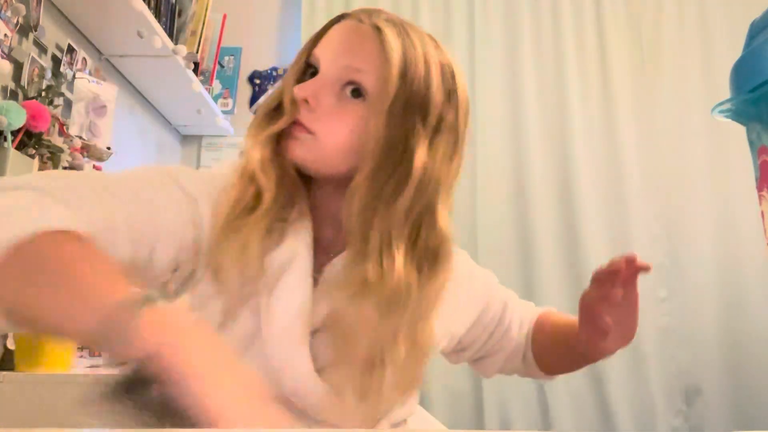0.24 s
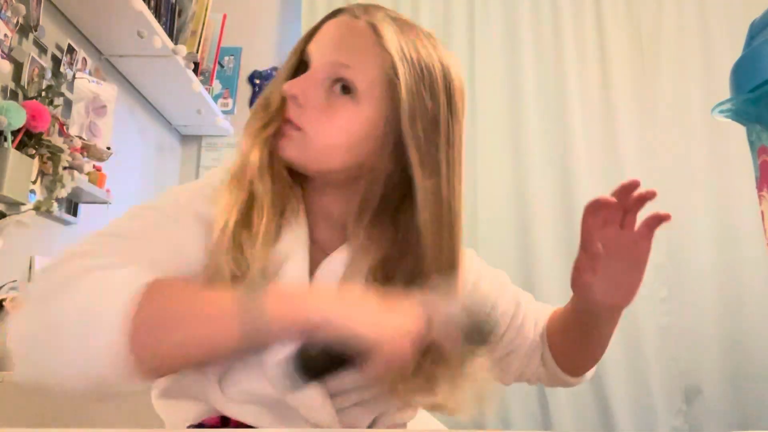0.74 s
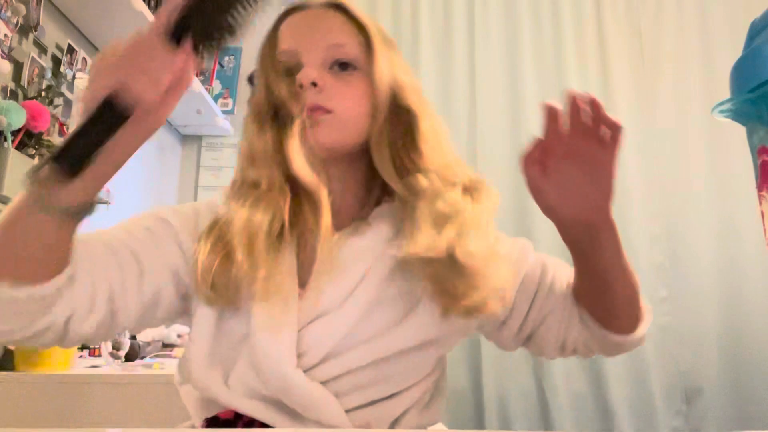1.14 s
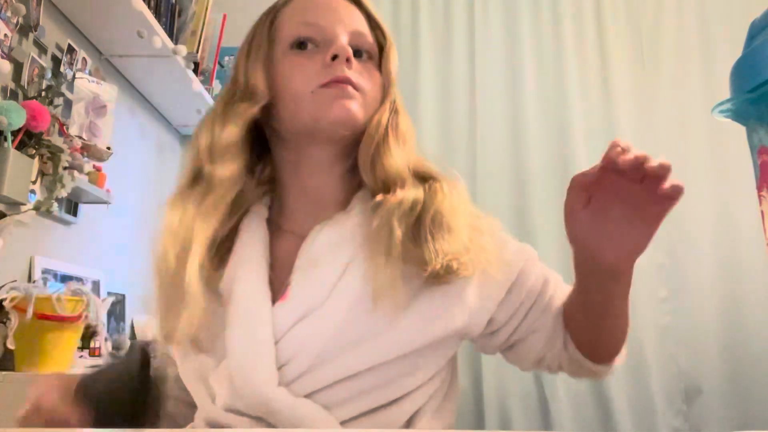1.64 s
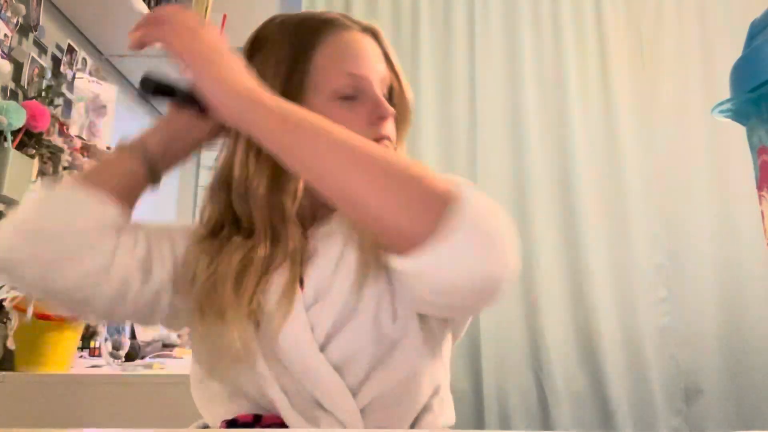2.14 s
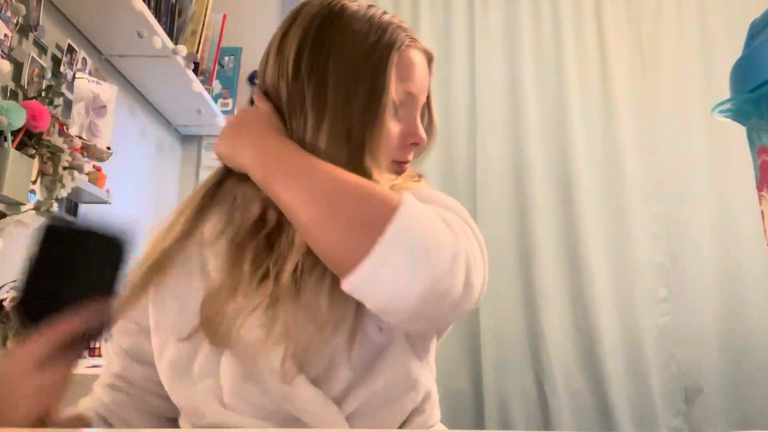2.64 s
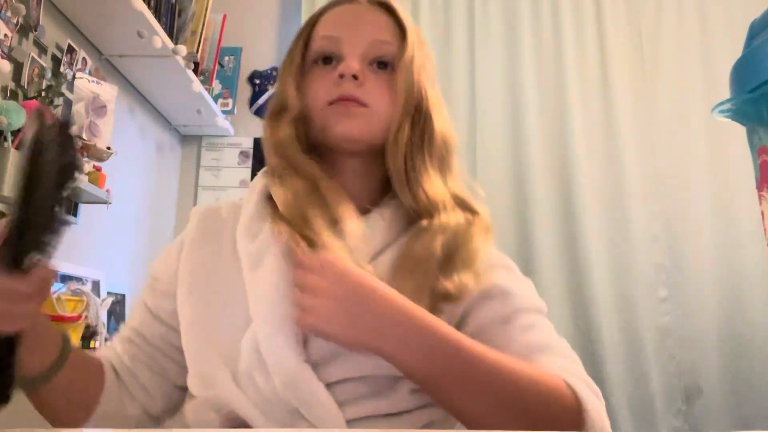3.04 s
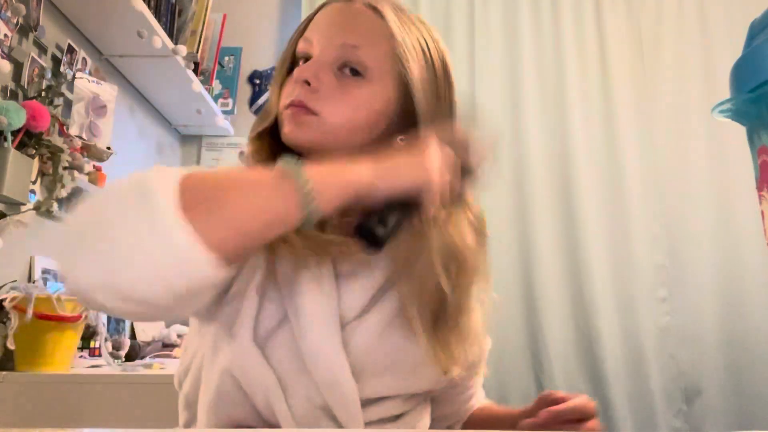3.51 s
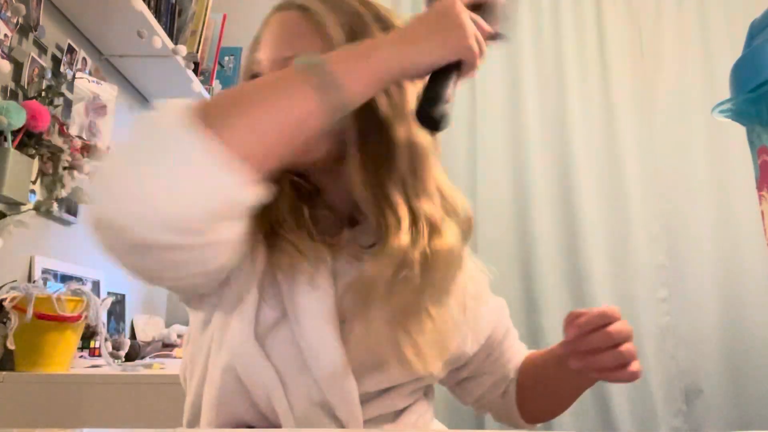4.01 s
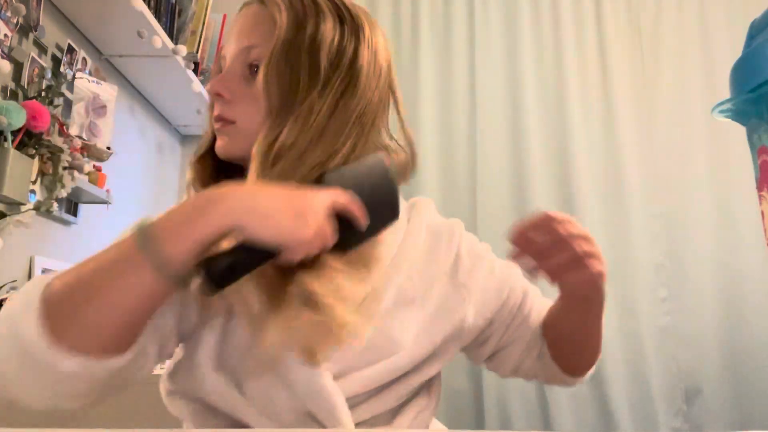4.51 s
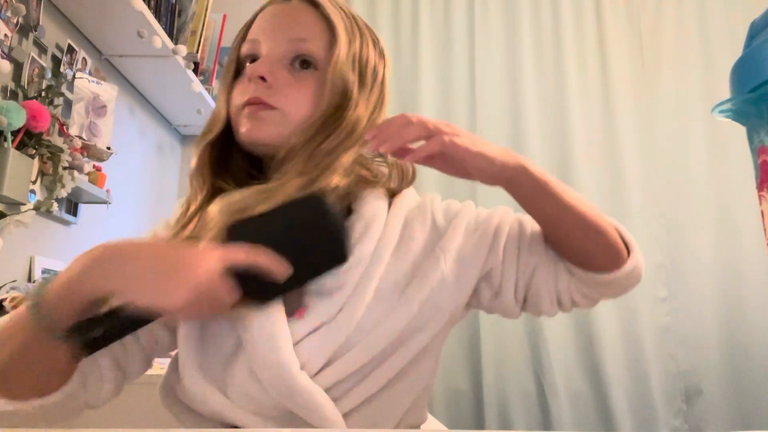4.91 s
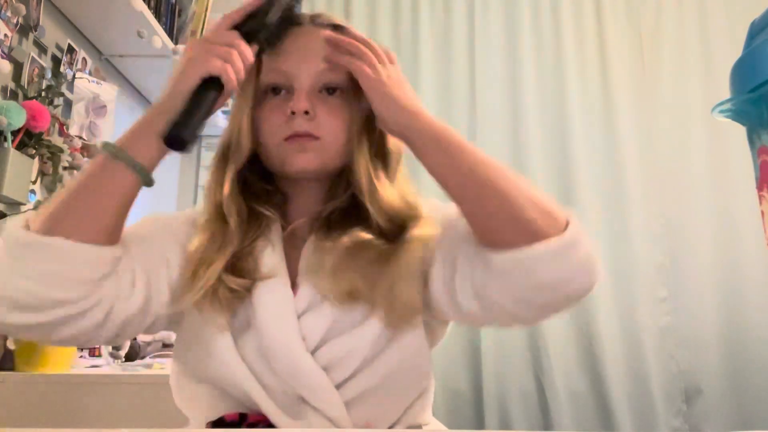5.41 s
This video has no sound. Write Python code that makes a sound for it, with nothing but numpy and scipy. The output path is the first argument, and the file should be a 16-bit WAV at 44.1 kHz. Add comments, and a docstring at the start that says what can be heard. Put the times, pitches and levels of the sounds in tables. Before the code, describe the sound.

Close in a small curtained room, a hollow cushioned plastic brush pulls through long hair in about ten short, scratchy strokes separated by brief gaps. Soft rustle and fine hiss mix with dull, hollow shaking and small tangle tugs. A sharp knock comes early, a weaker one near the middle, and the loudest near the end, just after a burst of rough tugs. A desk microphone picks up faint low room rumble.

```python
"""Small curtained room, microphone on a desk: an air-cushioned plastic paddle brush pulls through long hair.
Strands slip off the pins: noise-like trains of clicks rustle, hiss and shake the hollow paddle's resonances.
Tangles let go in tugs, single pins snap back, and three times the paddle knocks on something hard.
The direct sound reaches two microphone ports, a dense short room tail follows; beneath lies a low rumble
of unsteady level."""
import sys
import numpy as np
from scipy import signal
from scipy.fft import rfft, irfft, next_fast_len
from scipy.io import wavfile
from scipy.ndimage import uniform_filter1d

SR = 44100
rng = np.random.default_rng(int(sys.argv[2]) if len(sys.argv) > 2 else 0)


def wav_record(signal):
    """Record a signal, one row per channel, as 16-bit PCM in the file named by sys.argv[1]."""
    frames = np.transpose(np.atleast_2d(signal))
    bounded = np.clip(frames, -1, 1)
    # unit amplitude maps onto the largest positive 16-bit level
    quanta = np.round(bounded * 32767).astype(np.int16)
    wavfile.write(sys.argv[1], SR, quanta)


N = 249209
SIZE = next_fast_len(N + SR)   # FFT length, with room for a tail
HZ = np.maximum(np.arange(SIZE // 2 + 1) * SR / SIZE, 1)


def amp(db):
    """Decibels to gain."""
    return 10 ** (np.asarray(db) / 20)


def rms_one(x):
    """Scaled to rms 1."""
    return x / np.sqrt(np.mean(x ** 2) + 1e-20)


def in_time(rows):
    """Columns of a curve table, sample by sample."""
    s, *columns = np.transpose(rows)
    return [np.interp(np.arange(N) / SR, s, column) for column in columns]


def over_hz(points):
    """A spectrum table on the FFT grid, interpolated over log frequency."""
    hz, value = np.transpose(points)
    return np.interp(np.log(HZ), np.log(np.maximum(hz, 1)), value)


def shaped(x, response):
    """Filtered by a frequency response."""
    return irfft(rfft(x, SIZE) * response, SIZE)[..., :N]


def slips(per_s, spread_db):
    """Random clicks of uneven size and sign."""
    sizes_db = spread_db * np.minimum(rng.exponential(1, N), 3.2)
    clicks = amp(sizes_db) * rng.choice([-1, 1], N)
    return clicks * (rng.random(N) < per_s / SR) + 1e-18


def ring(x, hz, t60):
    """A two-pole resonance: a unit click sets a sine of height 1 ringing."""
    radius = amp(-60 / (t60 * SR))
    turn = 2 * np.pi * hz / SR
    return signal.lfilter([0, np.sin(turn)], [1, -2 * radius * np.cos(turn), radius ** 2], x + 1e-18)


def resonate(x, peaks):
    """Parallel resonances of given width, alternating in sign; rms 1."""
    total = np.zeros(N)
    for k, (hz, width, db) in enumerate(peaks):
        t60 = np.log(1000) / (np.pi * width)
        total += (-1) ** k * amp(db) * width * ring(x, hz, t60)
    return rms_one(total)


def resonate_twice(x, peaks):
    """The same resonances in series with themselves leave dark valleys between the peaks."""
    return resonate(resonate(x, peaks), peaks)


def push(at_s, length_ms, db=0):
    """A smooth contact force: start sample and shape, its area set in dB."""
    shape = np.hanning(max(int(length_ms * SR / 1000), 1) + 2)[1:-1]
    return round(at_s * SR), amp(db) * shape / shape.sum()


def add(track, start, shape):
    """Mixes a short shape into a track."""
    track[start:start + len(shape)] += shape[:N - start]


# spectrum of the room air: f/Hz, relative level/dB
AIR_COLOUR = [(12, -46), (20, -8), (96, 1), (146, -19), (182, -15), (216, -32.5), (270, -23.5),
              (301, -43.5), (527, -36), (1090, -46.5), (1220, -39.5), (1910, -45.5), (2750, -47.5),
              (13900, -60), (16000, -72)]
# correlation of left and right, limited to 0..1 in use: f/Hz, likeness
AIR_LIKENESS = [(60, 0.83), (180, 0.68), (550, 0.33), (1650, -2.2), (4970, -0.95), (15000, 0.53)]
# low rumble of unsteady level: t/s, level/dB
RUMBLE_LEVEL = [(0.0, -63), (0.58, -49), (0.96, -53), (1.98, -62.5), (2.28, -58.5), (3.96, -55.5),
                (5.1, -54.5), (5.3, -58), (5.65, -63)]
AIR_DB, RUMBLE_TOP_HZ = -55, 190   # the level sets the air left above the rumble


def air():
    """Room air as filtered noise: low rumble of unsteady level under a faint steady hiss."""
    mid, side = rng.standard_normal((2, N))
    alike = np.clip(over_hz(AIR_LIKENESS), 0, 1)
    colour = amp(over_hz(AIR_COLOUR))
    mid = shaped(mid, colour * np.sqrt(1 + alike))
    side = shaped(side, colour * np.sqrt(1 - alike))
    both = amp(AIR_DB) * rms_one(mid + side * [[1], [-1]])
    low = signal.sosfilt(signal.butter(4, RUMBLE_TOP_HZ, fs=SR, output="sos"), both)
    rumble_db = in_time(RUMBLE_LEVEL)[0]
    return both - low + amp(rumble_db) * rms_one(low)


# one list per stroke: t/s, pressure heard as cushion shaking level/dB, rustle level/dB, fine hiss level/dB
STROKES = [
    [(0.0, -50, -61.5, -64), (0.044, -54.5, -61.5, -69), (0.166, -52.5, -61, -68), (0.226, -63, -60.5, -68),
     (0.354, -62.5, -63.5, -73.5), (0.408, -73, -90, -103), (0.44, -89, -103, -107)],
    [(0.535, -63.5, -87, -100), (0.555, -47.5, -74, -76), (0.609, -52, -57.5, -65.5),
     (0.629, -56.5, -65, -59.5), (0.793, -57, -74, -76), (0.841, -62, -89, -105), (0.93, -63.5, -99, -107)],
    [(1.27, -76, -95, -102), (1.29, -57.5, -93, -91.5), (1.422, -50.5, -64.5, -66), (1.58, -65, -70, -68.5),
     (1.624, -48, -72, -73), (1.678, -68, -103, -103), (1.73, -79, -103, -107)],
    [(2.05, -95, -91.5, -103), (2.056, -82.5, -101, -103), (2.086, -64, -73, -86.5),
     (2.202, -54.5, -62, -73.5), (2.25, -61.5, -71, -74), (2.304, -56, -68.5, -73), (2.37, -61, -71.5, -70)],
    [(2.45, -56, -67, -65), (2.52, -49.5, -65.5, -71), (2.596, -55.5, -72, -76), (2.626, -50, -89, -82.5),
     (2.666, -78, -103, -101), (2.674, -78, -93.5, -94), (2.7, -80, -103, -92)],
    [(3.385, -77, -92, -100), (3.415, -52, -73, -83), (3.537, -55, -69.5, -66), (3.623, -65.5, -77, -73),
     (3.681, -50.5, -78.5, -75.5), (3.735, -71.5, -100, -100), (3.77, -79, -99, -101)],
    [(4.11, -84, -95.5, -104), (4.128, -60, -84.5, -86.5), (4.154, -57, -72, -79),
     (4.176, -61.5, -77, -82.5), (4.192, -60, -72.5, -78), (4.236, -53, -71, -76),
     (4.28, -68.5, -88.5, -89)],
    [(4.3, -60.5, -74, -79), (4.348, -57, -73.5, -76), (4.418, -59.5, -70.5, -71.5),
     (4.604, -48.5, -67, -73), (4.624, -55, -73.5, -79), (4.75, -49, -68.5, -80.5),
     (4.8, -57.5, -68.5, -74)],
    [(4.82, -49.5, -65, -75), (4.888, -46, -59, -71), (4.956, -25.5, -51.5, -65), (4.968, -54, -66, -70),
     (4.996, -59.5, -74, -83), (5.04, -47.5, -73, -100)],
    [(5.4, -76.5, -90, -90.5), (5.43, -57.5, -91, -73.5), (5.45, -57, -87.5, -84), (5.496, -55.5, -83, -74),
     (5.534, -56, -69.5, -69), (5.604, -66, -89, -77), (5.65, -68, -82.5, -70.5)],
]
# grip colour, one row per stroke: low face modes level/dB and upper face modes level/dB (both against a
# blend of shaking and rustle), pin singing level/dB and coarse rasp level/dB (against the rustle),
# dull bass level/dB (against the shaking)
GRIPS = [(-9.5, -8.5, -3, -4, -10.5), (-6.5, -4.5, -2, -2.5, -1), (-10.5, -1.5, -4, -4.5, -2),
         (-8, 3.5, -4.5, -2, -11.5), (-5.5, -1, -3.5, -12, -8), (-5.5, -3.5, 0.5, -6.5, -10.5),
         (-1.5, 6, 2.5, 4, -10.5), (-1, -3, -0.5, -6.5, -10), (-3.5, -8, -5.5, -6, -19),
         (-11.5, 3.5, -3, -5, -5)]


def controls():
    """Pressure, rustle, hiss and grip colours, sample by sample."""
    return in_time([(*row, *grip) for stroke, grip in zip(STROKES, GRIPS) for row in stroke])


# cushion under the hand, passed twice: f/Hz, width/Hz, level/dB per pass
CUSHION = [(280, 220, -4), (336, 34, -0.5), (438, 98, -6.5)]
# lower modes of the face under the hand, passed twice: f/Hz, width/Hz, level/dB per pass
LOW_FACE = [(598, 35, -3.5), (749, 140, 0.5)]
# upper modes of the face, passed twice: f/Hz, width/Hz, level/dB per pass
UPPER_FACE = [(913.5, 330, 5), (1182, 23, -2)]
# singing pins: f/Hz, width/Hz, relative level/dB
PINS = [(1680, 120, 6.5), (1870, 200, -7.5)]
# a faint narrow band of hiss around 1.7 kHz: t/s, level/dB
NARROW_HISS = [(0.0, -94), (0.22, -64), (0.35, -82.5), (1.49, -69.5), (1.64, -93.5), (2.08, -97.5),
               (2.33, -88), (2.72, -92), (4.14, -98), (4.34, -93), (4.94, -72), (5.65, -71)]
# shell under coarse slips, passed twice: f/Hz, width/Hz, level/dB per pass
RASP = [(1450, 380, 0), (2410, 900, 1)]
# spectrum of the rustle: f/Hz, relative level/dB per Hz
RUSTLE = [(900, -30), (1300, -3), (2100, -2), (2700, -4.5), (3800, -6), (5000, -8.5), (6600, -7),
          (7300, -12), (9000, -61)]
# spectrum of the fine hiss: f/Hz, relative level/dB per Hz
HISS = [(6000, -50), (7500, -16), (8600, -5), (10000, -1.5), (12000, 0), (14000, -2), (15600, -4),
        (16200, -14)]
LOW_FACE_SHARE, FACE_SHARE = .75, .6   # share of the level that follows pressure, the rest follows the rustle


def strokes():
    """Strands slipping off the pins: sparse slips shake the paddle, dense ones rustle and hiss."""
    shake_db, rustle_db, hiss_db, low_db, face_db, pin_db, rasp_db, _ = controls()
    low_db = low_db + rustle_db + LOW_FACE_SHARE * (shake_db - rustle_db)
    face_db = face_db + rustle_db + FACE_SHARE * (shake_db - rustle_db)
    jolts = slips(per_s=830, spread_db=3.0)
    shake = amp(shake_db) * resonate_twice(jolts, CUSHION)
    shake += amp(low_db) * resonate_twice(jolts, LOW_FACE)
    shake += amp(face_db) * resonate_twice(jolts, UPPER_FACE)
    rasp = amp(rustle_db + rasp_db) * resonate_twice(jolts, RASP)

    # the pins and the faint narrow hiss share one band of noise, their powers added
    narrow_db = in_time(NARROW_HISS)[0]
    band_gain = np.hypot(amp(rustle_db + pin_db), amp(narrow_db))
    pin_band = band_gain * resonate(slips(per_s=1600, spread_db=4.0), PINS)

    # strands slip in bunches around each jolt
    scratchy = (uniform_filter1d(np.abs(jolts), size=260) + 0.025) ** 0.14
    strands = shaped(slips(per_s=4600, spread_db=1.0), amp(over_hz(RUSTLE)))
    rustle = amp(rustle_db) * rms_one(scratchy * strands)
    fine = shaped(slips(per_s=7800, spread_db=3.5), amp(over_hz(HISS)))
    hiss = amp(hiss_db) * rms_one(fine)
    return shake + pin_band + rasp + rustle + hiss


# dull bass under a hard pull, passed twice: f/Hz, width/Hz, level/dB per pass
BASS = [(124, 60, -0.5), (200, 27, -5)]


def bass():
    """A dull resonant low noise that rises with the pressure of the pull."""
    shake_db, *_, bass_db = controls()
    return amp(shake_db + bass_db) * resonate_twice(rng.standard_normal(N), BASS)


# paddle modes: f/Hz, relative level/dB, free t60/s (shortened by the damping in use)
PADDLE = [(280, -10, 0.067), (360, 7.5, 0.044), (397, -4.5, 0.034), (551.5, -11, 0.095), (791, 0, 0.021),
          (943, -6, .035), (1115, -5.5, 0.023), (1308, -8, 0.0085), (1875, -5, 0.0084), (1936, -14, 0.022),
          (2300, -13, 0.0043), (3460, -18, .007), (4140, -20.5, 0.021), (4770, -19.5, 0.0087)]
HOLLOW_TOP_HZ, FACE_TOP_HZ = 500, 1250   # cushion modes below, face modes between, shell modes above


def paddle(forces, damping):
    """Cushion, face and shell modes, each group driven by its own force; damping scales the t60."""
    edges = (0, HOLLOW_TOP_HZ, FACE_TOP_HZ, SR)
    groups = []
    for force, low, high in zip(forces, edges[:-1], edges[1:]):
        modes = [mode for mode in PADDLE if low <= mode[0] < high]
        groups.append(sum(amp(db) * ring(force, hz, t60 * damping) for hz, db, t60 in modes))
    return groups


# tangles letting go, the run starting 3 ms ahead of t:
# t/s, cushion peak level/dB, face peak level/dB, shell peak level/dB, length/ms
TUGS = [(0.159, -44.5, -52, -61, 9.7), (0.556, -42, -36.5, -55, 13), (0.589, -38.5, -34, -45, 28),
        (0.768, -36.5, -46, -59, 10.2), (1.298, -44.5, -60.5, -69, 11.9), (1.403, -35, -36.5, -55, 7.5),
        (1.426, -42, -50, -39, 19.4), (1.514, -49, -44, -54.5, 10), (1.623, -50, -36, -80, 5.2),
        (2.518, -53.5, -42, -52, 17), (3.201, -71.5, -59, -78, 16.3), (3.416, -45.5, -45.5, -48.5, 9.8),
        (3.463, -40, -43, -38.5, 21), (3.53, -43.5, -36.5, -56, 4.5), (3.675, -37.5, -64.5, -71, 7.5),
        (3.998, -77.5, -57, -85, 18.7), (4.468, -55, -44, -60, 4.8), (4.486, -36, -60, -64, 8.2),
        (4.566, -30, -63, -72, 23), (4.642, -53, -43.5, -47, 13), (4.704, -56, -46.5, -65, 7.6),
        (4.735, -44.5, -71, -53, 6.1), (4.853, -32.5, -44, -50, 8), (4.9, -25.5, -51, -59, 4.3),
        (4.922, -20, -29.5, -55, 3.8), (4.942, -22, -24.5, -53, 9.1), (4.958, -22, -28.5, -46, 9.6)]
SOFT_CYCLES = 17   # a longer tug is duller: its top pitch is this many cycles per length, 4 kHz at most


def tugs():
    """A tangle gives way as a quick run of slips that swells and fades; the hand damps the ring."""
    out = np.zeros(N)
    runs = rng.standard_normal((len(TUGS), SR // 12))
    for (s, *peaks_db, length_ms), run in zip(TUGS, runs):
        start, shape = push(s - .003, length_ms)
        top_hz = min(1000 * SOFT_CYCLES / length_ms, 4000)
        soft = signal.butter(2, top_hz, fs=SR, output="sos")   # hair cushions the slips
        force = signal.sosfilt(soft, run) * np.pad(shape, (0, len(run) - len(shape)))
        for rung, db in zip(paddle([force] * 3, damping=0.66), peaks_db):
            add(out, start, amp(db) * rung / np.abs(rung).max())
    return out


# spectrum of a crack: f/Hz, relative level/dB per Hz
CRACK = [(1470, -35), (2500, -3), (3600, -9.5), (4020, -8), (6200, -17.5), (7650, -27), (8870, -23),
         (13800, -30.5), (16000, -41.5)]
TREBLE_HZ = 8000   # the treble level applies above this


def cracks(events, t60):
    """Bright noise bursts that die within milliseconds; rows t/s, level/dB, treble against the rest/dB."""
    both = np.zeros((2, N))
    after = np.arange(SR // 20) / SR
    bursts = rng.standard_normal((len(events), len(after)))
    for (s, db, treble_db), burst in zip(events, bursts):
        burst = np.r_[4.5, burst[1:]]   # one sharp contact leads, splinters of noise follow
        burst = burst * amp(db - 60 * after / t60)
        add(both[0], round(s * SR), burst)
        add(both[1], round(s * SR), amp(treble_db) * burst)
    colour = amp(over_hz(CRACK))
    colour = colour / np.sqrt(np.mean(colour ** 2))
    upper = 1 / (1 + (TREBLE_HZ / HZ) ** 12)
    return shaped(both, np.array([colour * (1 - upper), colour * upper])).sum(axis=0)


# knocks, levels of the driving forces and of the crack: t/s, shell level/dB, face level/dB,
# hollow thump level/dB, desk thud level/dB, crack level/dB, crack treble against its rest/dB,
# bounce after/ms, thump after/ms
KNOCKS = [(0.9708, -9.5, -10.5, -15.5, -25.5, -20.5, 4, 1.16, 2.26),
          (2.392, -27, -23.5, -37.5, -45.5, -27, 6, 1.45, 2.1),
          (5.077, -9.5, -4, -8, -31, -10, -6, 1.9, 4.5)]
BOUNCE_DB = 3.5   # second contact against the first
CLATTER_DB, CLATTER_T60_S = -16.5, .03   # the pins rattle after each knock, against the blow on the shell


def knocks():
    """The shell is struck and bounces once, the face is pushed too, the squeezed cushion thumps."""
    hollow, face, shell = np.zeros((3, N))
    after = np.arange(SR // 10) / SR
    clatter_fade = amp(CLATTER_DB - 60 * after / CLATTER_T60_S)
    rattles = rng.standard_normal((len(KNOCKS), len(after))) * clatter_fade
    for (s, shell_db, face_db, thump_db, *_, bounce_ms, thump_ms), rattle in zip(KNOCKS, rattles):
        add(shell, round(s * SR), amp(shell_db) * rattle)
        add(shell, *push(s, .12, shell_db))
        add(shell, *push(s + bounce_ms / 1000, .12, shell_db + BOUNCE_DB))
        add(face, *push(s + 0.00094, .4, face_db))
        add(hollow, *push(s + thump_ms / 1000, 1.3, thump_db))
    events = [(knock[0], knock[5], knock[6]) for knock in KNOCKS]
    return sum(paddle([hollow, face, shell], damping=0.88)) + cracks(events, t60=0.018)


# desk under the microphone: f/Hz, relative level/dB, t60/s
DESK = [(60.4, -7.5, 0.42), (97, 2, 0.084), (133, 0.5, 0.18), (164.95, 0.5, 0.093)]


def thuds():
    """Each knock travels through the desk to the microphone and rings the desk's low modes."""
    force = np.zeros(N)
    for s, _, _, _, thud_db, *_ in KNOCKS:
        add(force, *push(s + 0.0022, 3.5, thud_db))
    return sum(amp(db) * ring(force, hz, t60) for hz, db, t60 in DESK)


# single pins snapping back: t/s, level/dB
SNAPS = [(1.6192, -57.5), (4.5945, -49.5), (4.7035, -46), (4.854, -48.5), (4.899, -46.5), (4.945, -41),
         (4.9209, -37.5), (4.9568, -46.5)]


def snaps():
    """Single pins snap back with tiny bright cracks."""
    return cracks([(s, db, 1.5) for s, db in SNAPS], t60=0.0035)


# direct sound, phase between the ports: f/Hz, left lead/radians
PORT_PHASE = [(100, 0), (300, .4), (600, .9), (1100, .4), (2000, -.9), (4000, -1.2), (5500, -2.2),
              (7700, -2.7), (10000, -.6), (12000, 0)]
# direct sound, balance of the ports: f/Hz, left minus right level/dB
PORT_BALANCE = [(100, 0), (300, 0), (1200, 0.5), (4400, -1.5), (12000, -0.5)]


def ports(x):
    """Two microphone ports hear the direct sound with unlike level and phase."""
    half = amp(over_hz(PORT_BALANCE) / 2) * np.exp(.5j * over_hz(PORT_PHASE))
    return shaped(x, np.array([half, 1 / half]))


# decay of the main tail: f/Hz, t60/s
ROOM_T60 = [(300, .22), (1000, .22), (4000, 0.16), (12000, 0.18)]
ROOM_DB, ROOM_GAP_S = -9.5, 0.0028   # diffuse sound against direct, time to the first wall echo
LATE_DB, LATE_STRETCH = -22, 2.7   # a weaker, slower second tail
ROOM_ALIKE_HZ = 200   # below this both channels hear much the same echoes


def room(x):
    """Dense echoes: noise in octave bands, each with its own decay, unlike in each channel."""
    after = np.arange(SR // 2) / SR
    echoes = np.zeros((2, len(after)))
    hz, t60 = np.transpose(ROOM_T60)
    for low in 125 * 2. ** np.arange(7):
        band = signal.butter(2, [low, low * 2], "band", fs=SR, output="sos")
        fall_db = -60 * after / np.interp(np.log(low * np.sqrt(2)), np.log(hz), t60)
        fade = np.hypot(amp(fall_db), amp(LATE_DB + fall_db / LATE_STRETCH))
        mid, side = signal.sosfilt(band, rng.standard_normal((2, len(after)))) * fade
        alike = 1 / (1 + (low / ROOM_ALIKE_HZ) ** 2)
        echoes += np.sqrt(1 + alike) * mid + np.sqrt(1 - alike) * side * [[1], [-1]]
    echoes *= np.clip(after / ROOM_GAP_S - 1, 0, 1)   # silent through the gap, full after twice as long
    return shaped(x, rfft(echoes / np.sqrt(np.sum(echoes ** 2) / 2), SIZE))


def scene():
    """Brush, direct and through the room, with desk thuds and dull bass, over the room air."""
    brush = strokes() + tugs() + knocks() + snaps()
    # so small a body sends out no bass
    brush = signal.sosfilt(signal.butter(6, 245, "high", fs=SR, output="sos"), brush)
    low = (thuds() + bass()) * amp([[1.5], [-1.5]])   # left up, right down, in dB
    return air() + ports(brush) + amp(ROOM_DB) * room(brush) + low


CUTOFF_HZ = 16700   # 70 dB down from here up


def record(dry):
    """The microphone drops the deepest bass, peaks are rounded, the top is cut."""
    thin = signal.sosfilt(signal.butter(2, 40, "high", fs=SR, output="sos"), dry)
    rounded = 1.2 * np.tanh(thin / 1.2)
    return signal.sosfilt(signal.cheby2(14, 70, CUTOFF_HZ, fs=SR, output="sos"), rounded)


dry = scene()
out = record(dry)
wav_record(out)
```